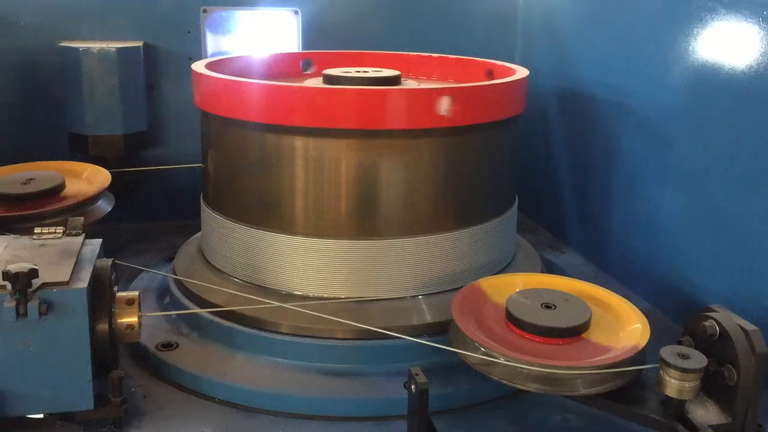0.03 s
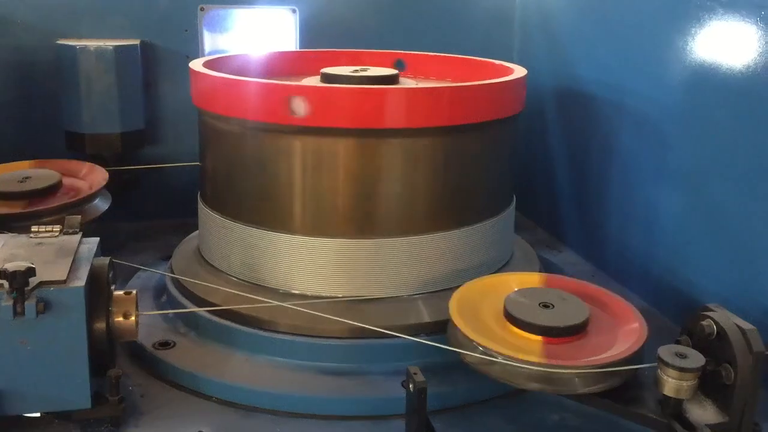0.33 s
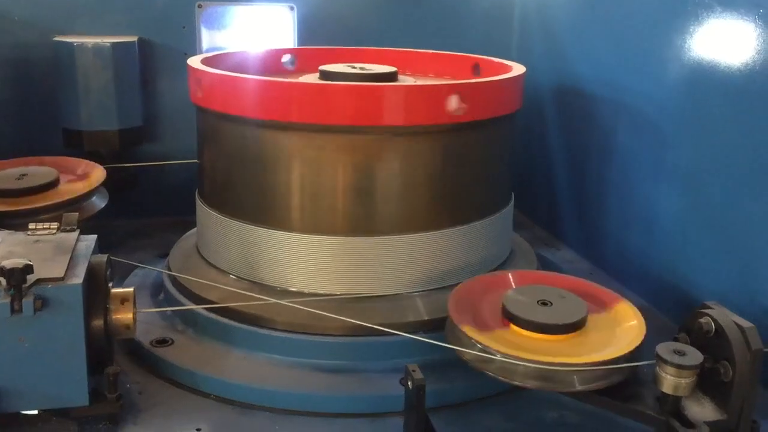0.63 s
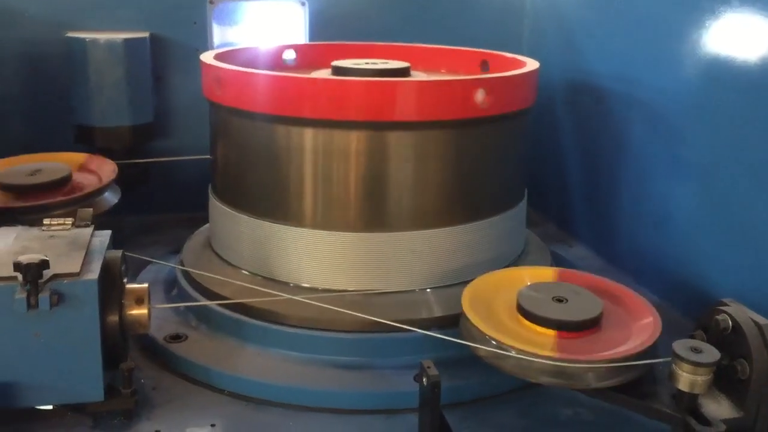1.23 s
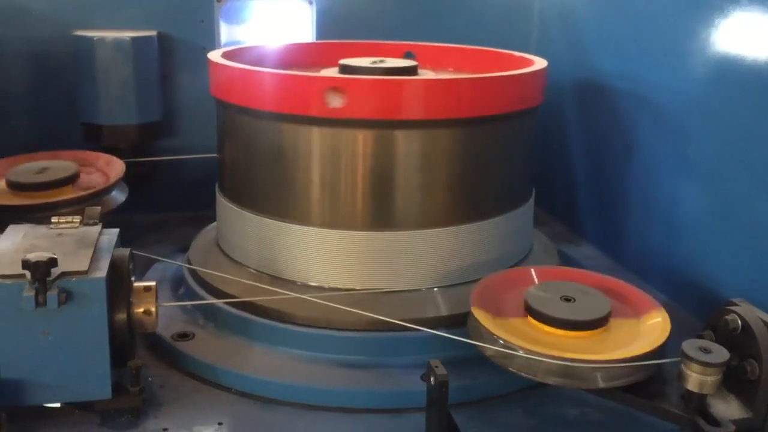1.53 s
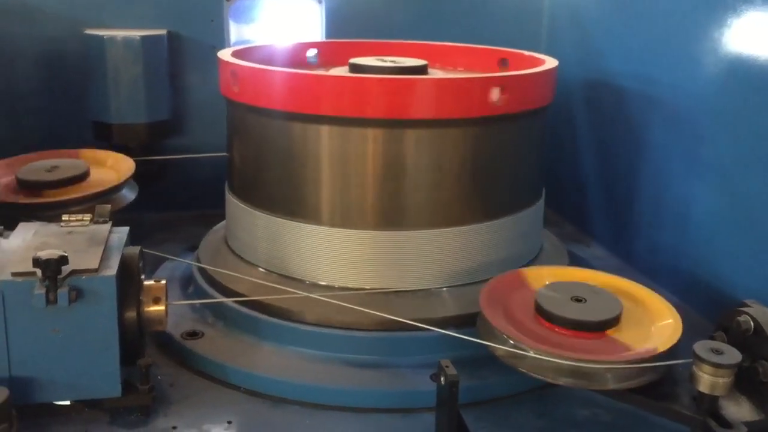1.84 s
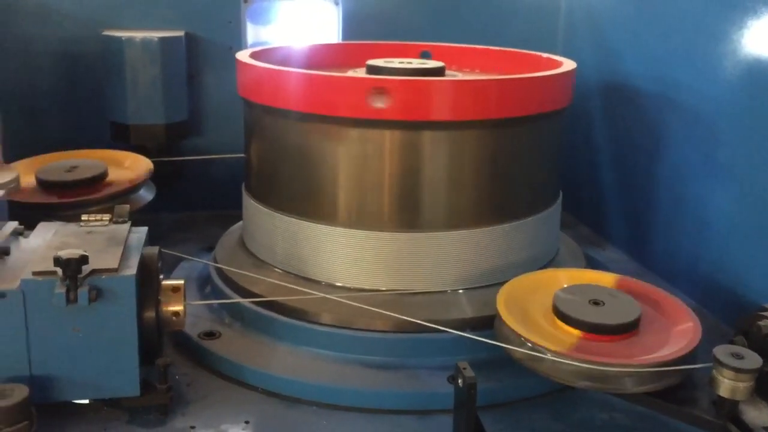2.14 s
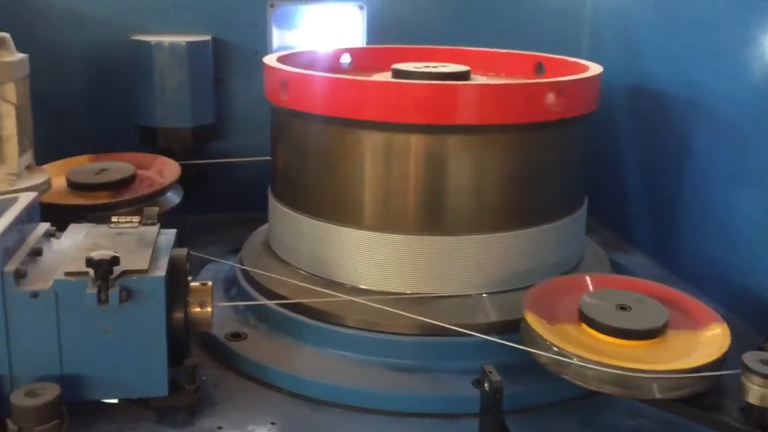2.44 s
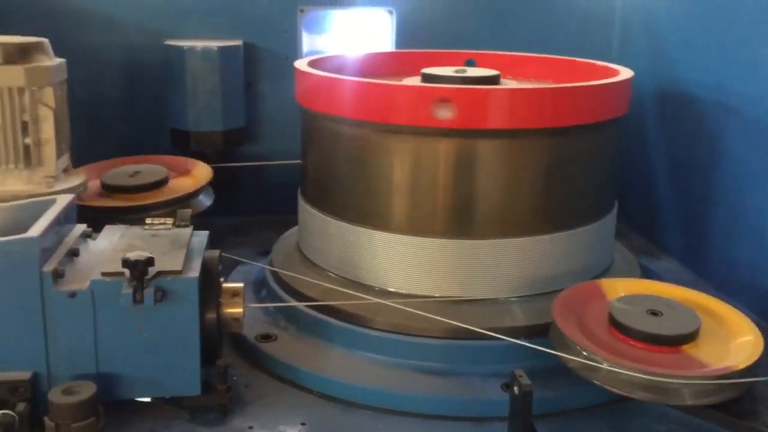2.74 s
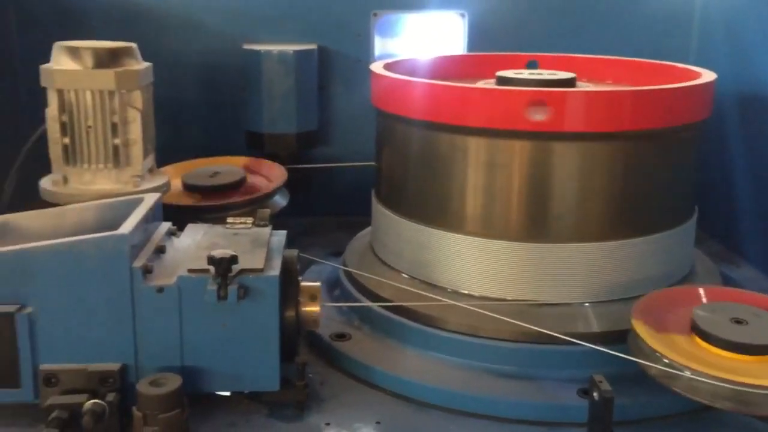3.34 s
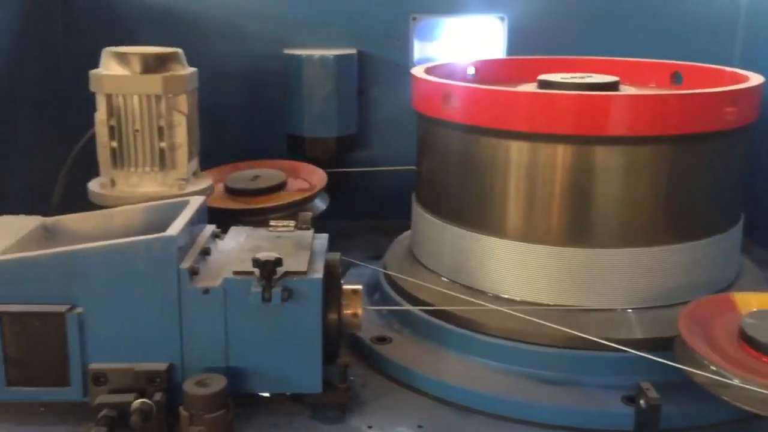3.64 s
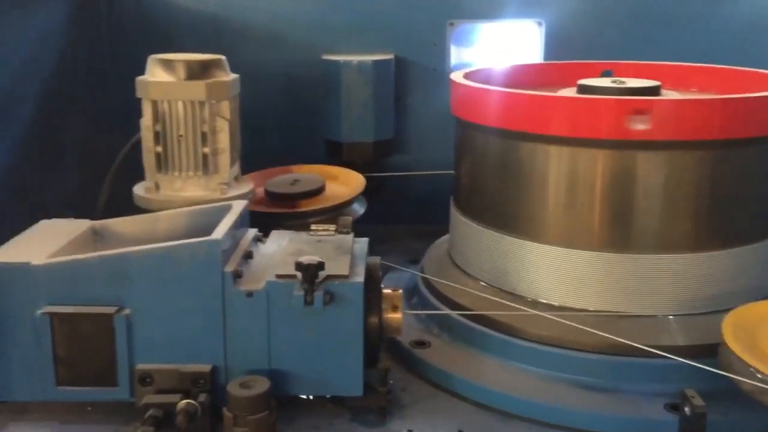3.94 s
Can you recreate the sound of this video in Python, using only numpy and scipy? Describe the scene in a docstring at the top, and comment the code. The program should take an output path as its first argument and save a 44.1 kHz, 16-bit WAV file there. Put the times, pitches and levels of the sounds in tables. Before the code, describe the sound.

Steady factory machine roar, with humming motors, thin whistling tones and hissing, squeaking wire.

```python
"""A steady machine roar with a low hum fills a factory hall: wire drawing, one microphone close by.
Gears and fans roar through the ringing housing, motors hum and a gear tone swells once a turn.
The switching of the motor drives whistles near 5 and 10 kHz. On top, the wire hisses through
the die, rubs on the pulleys, scrapes on the drum and squeaks as it sticks and slips."""
import sys
import numpy as np
from scipy import signal
from scipy.fft import rfft, irfft
from scipy.io import wavfile

SR = 44100
rng = np.random.default_rng(int(sys.argv[2]) if len(sys.argv) > 2 else 0)


def pcm_store(signal):
    """Save signal as 16-bit PCM."""
    levels = np.round(np.clip(np.atleast_2d(signal), -1, 1) * 32767)
    wavfile.write(sys.argv[1], SR, levels.astype(np.int16).T)


N = 176400


def undb(db):
    """Decibels to gain."""
    return 10 ** (np.asarray(db) / 20)


def unit(x):
    """Scale to rms 1."""
    return x / np.sqrt(np.mean(x ** 2))


def curve(t, rows):
    """Gain along a curve of t/s, level/dB."""
    return undb(np.interp(t, *np.array(rows).T))


def coloured_noise(spectrum):
    """Noise of rms 1, shaped by points of f/Hz, level/dB."""
    hz, db = np.array(spectrum).T
    f = np.maximum(np.fft.rfftfreq(N, 1 / SR), 1)
    gain = undb(np.interp(np.log(f), np.log(hz), db))
    return unit(irfft(rfft(rng.standard_normal(N)) * gain, N))


def resonance(hz, width):
    """Noise of rms 1 ringing in one resonance."""
    f = np.fft.rfftfreq(N, 1 / SR)
    return unit(irfft(rfft(rng.standard_normal(N)) / (1 + ((f - hz) / width * 2) ** 2), N))


def drift(rate_hz):
    """Smooth random drift of rms 1, rolling off above rate_hz."""
    f = np.fft.rfftfreq(N, 1 / SR)
    return unit(irfft(rfft(rng.standard_normal(N)) * (f > 0) / (1 + (f / rate_hz) ** 4), N))


def tone(hz, flutter, rate_hz):
    """A sine of rms 1 whose strength and phase flutter."""
    phase = 2 * np.pi * (np.cumsum(hz * np.ones(N)) / SR + rng.random())
    in_phase = np.sin(phase) * (1 + flutter * drift(rate_hz))
    quadrature = np.cos(phase) * flutter * drift(rate_hz)
    return unit(in_phase + quadrature)


def roar(t):
    """The bed of the sound: gear and fan noise, shaken by the running parts, rings the housing."""
    # gear and fan noise: f/Hz, relative level/dB
    spectrum = [(25, -29.6), (36, -19), (47, -4), (65, -0.5), (110, -2.5), (200, -1), (330, -3), (480, -5),
                (680, -6), (1000, -7), (1300, -10.5), (2000, -12.5), (2700, -14.5), (3500, -22),
                (5500, -31), (7000, -40.5), (9200, -32), (11000, -40.5), (13300, -45.5)]
    # housing resonances: f/Hz, width/Hz, level/dB before the sway
    modes = [(258.4, 45, -36), (307.4, 11, -35.5), (390, 30, -42.5), (605, 135, -38.5), (890, 79, -44),
             (1660, 40, -42), (2923, 120, -48.5)]
    # slow sway of the whole roar: t/s, gain/dB
    sway = [(.12, -0.3), (.6, -0.5), (1.2, 0.3), (1.8, 0), (2.6, -0.24), (3.3, 0), (4, -0.4)]
    broad = coloured_noise(spectrum) * undb(-21.5)
    housing = sum(undb(db) * resonance(hz, width) for hz, width, db in modes)
    shake = undb(.5 * drift(45))
    return (broad + housing) * curve(t, sway) * shake


def rumble(t):
    """A low rumble surges briefly, twice."""
    # bell-shaped surges: middle t/s, half-length/s, peak level/dB
    surges = [(2.91, .05, -21.5), (3.128, 0.1, -29)]
    # rumble: f/Hz, relative level/dB
    spectrum = [(25, -18), (48, 4), (90, -7), (170, -2), (330, -3), (700, -22), (2000, -48)]
    swell = sum(undb(db) * np.exp(-((t - middle) / half) ** 2) for middle, half, db in surges)
    return swell * coloured_noise(spectrum)


def drum_motor(t):
    """The motor that turns the drum gives a firm low hum."""
    # hum: t/s, level/dB
    level = [(.12, -32.5), (.6, -30), (1.2, -28), (1.85, -25.5), (2.3, -31), (3.2, -29.5), (4, -32.5)]
    return curve(t, level) * tone(98.9, flutter=.16, rate_hz=5)


def motors_and_gears(t):
    """Motors and gear stages hum and whine, all on one slightly wandering speed."""
    # hum of motors and gears: f/Hz, level/dB, flutter/0-1
    hum_tones = [(126.8, -36, .2), (167, -42, .3), (309, -41.5, .4), (429, -43, .4), (586, -40, .4),
                 (799, -45, .4), (911, -46, .4), (1581, -46, .4), (2562, -52, .3), (2789.5, -51, .4),
                 (6282, -59.5, .5)]
    # mid drone of the motors: t/s, level/dB
    drone_level = [(.5, -35), (.75, -30), (1.1, -36), (1.7, -34), (2.05, -30), (2.3, -35), (2.6, -31),
                   (3.2, -33), (3.52, -29.5), (3.8, -33)]
    # thin gear whine: t/s, level/dB
    whine_level = [(.25, -40), (.85, -46), (1.3, -37.5), (1.45, -44), (2.9, -45), (3.3, -40), (3.82, -36),
                   (4, -41)]
    # spurts of motor slot whine: t/s, level/dB
    slot_level = [(.12, -40), (.33, -42), (.82, -35.5), (1, -42), (1.42, -46), (1.66, -38), (1.9, -35.5),
                  (2.25, -46), (2.46, -37.5), (2.86, -38.5), (3, -48), (3.29, -40), (3.42, -47), (4, -41)]
    # its faint sidebands: offset/steps, level/dB
    slot_sidebands = [(-1, -50), (1, -50), (2, -49.5), (3, -48.5)]
    # gear mesh tone: t/s, gain/dB
    mesh_gain = [(.25, 0), (.85, -2), (1.15, 2.5), (1.45, -2), (2.3, .5), (3.2, 1.7), (3.5, 0)]
    slot_hz, step_hz = 2870.5, 66.5
    turn_hz, weakest_s, depth = 3.41, .405, .88
    speed = 1 + .00043 * drift(2.28)
    hum = sum(undb(db) * tone(hz * speed, flutter, rate_hz=4.9) for hz, db, flutter in hum_tones)
    drone = curve(t, drone_level) * tone(608.5 * speed, flutter=.36, rate_hz=16)
    whine = curve(t, whine_level) * tone(1267.5 * speed, flutter=.2, rate_hz=4.5)
    slots = curve(t, slot_level) * tone(slot_hz * speed, flutter=.42, rate_hz=22)
    sidebands = sum(undb(db) * tone((slot_hz + k * step_hz) * speed, flutter=.42, rate_hz=14)
                    for k, db in slot_sidebands)
    swell = 1 - depth * (1 - np.abs(np.sin(np.pi * turn_hz * (t - weakest_s))))  # once a turn
    mesh_tone = tone(1380 * speed, flutter=.097, rate_hz=6.1)
    mesh = undb(-35.5) * curve(t, mesh_gain) * unit(swell * mesh_tone)
    return hum + drone + whine + slots + sidebands + mesh


def drives(t):
    """The switching of the drives makes the windings whistle in clusters of beating tones."""
    # switching tones: f/Hz, level/dB before the upper cluster's gain
    switching = [(4877, -52.5), (4889, -58), (4908.5, -53.5), (4919, -55), (4960, -58), (4972, -57),
                 (5082, -54), (5091.5, -51), (5111, -52), (5123, -55), (9507, -64), (9588, -63),
                 (9949, -58), (10000, -52), (10036.5, -58), (10054, -60), (10104, -62), (10390, -64)]
    # upper cluster: t/s, gain/dB
    upper_gain = [(.4, 2), (1.25, -3.5), (1.8, .5), (2.35, 2), (3, 1), (3.2, -1), (4, -2)]
    # bands of crowded sidebands: f/Hz, width/Hz, level/dB
    bands = [(5200, 330, -55), (9560, 170, -54.5), (10070, 88, -57)]
    upper = curve(t, upper_gain)
    whistle = sum(undb(db) * (upper if hz > 9000 else 1) * tone(hz, flutter=.15, rate_hz=1.5)
                  for hz, db in switching)
    sizzle = sum(undb(db) * resonance(hz, width) for hz, width, db in bands)
    return whistle + sizzle


def die_hiss(t):
    """The wire slides through the die with a flickering hiss."""
    # hiss: f/Hz, relative level/dB
    spectrum = [(1500, -20), (3000, -2.5), (4100, 3), (4600, -1), (5400, 1), (7000, -6.5), (9000, -17.5),
                (11000, -13), (14000, -23.5)]
    # its course: t/s, level/dB
    level = [(.12, -37), (.3, -39), (.4, -41.5), (.68, -44), (.8, -39), (1.2, -40), (2, -38.5), (2.65, -38),
             (2.9, -40), (4, -39.5)]
    return coloured_noise(spectrum) * curve(t, level) * undb(1.34 * drift(50))


def drum_scrapes(t):
    """Turns of wire slip on the drum: each scrape starts sharply and dies away."""
    # slips: t/s, decay/s, starting level/dB
    slips = [(.77, .08, -49), (1.365, .015, -37), (1.715, .02, -48), (1.95, .07, -38.5), (3.59, .01, -41)]
    # scrape noise: f/Hz, relative level/dB
    spectrum = [(3000, -12), (6000, 0), (9000, -1), (12000, 0), (15500, -3)]
    envelope = sum(undb(db) * (t > start) * np.exp(-np.abs(t - start) / decay)
                   for start, decay, db in slips)
    return envelope * coloured_noise(spectrum)


def pulley_rub(t):
    """The wire rubs on the pulleys: six narrow bands of friction noise flare at random."""
    # gritty rubbing: t/s, level/dB
    level = [(.12, -56), (1.4, -55), (1.65, -57), (2.65, -51), (2.85, -57), (4, -57)]
    flicker_db = 6
    bands = sum(resonance(hz, width=330) * undb(flicker_db * drift(12))
                for hz in np.linspace(6600, 7960, 6))
    return unit(bands) * curve(t, level)


def wire_squeaks(t):
    """Brief stick-slip sets a pair of wire modes singing, with a scratchy chatter."""
    # squeaks: t/s, length/s, first mode f/Hz, second mode f/Hz, level/dB, roughness/0-1
    squeaks = [(.18, .05, 8620, 8400, -48, .2), (.335, .065, 8829, 8193, -44.5, .3),
               (.477, .036, 8349, 8640, -39.5, .25), (.507, .04, 8393, 8624, -44.5, .35),
               (.592, .025, 7760, 8020, -47, .2), (1.23, .105, 8274, 8726, -47, .05),
               (1.6, .05, 7000, 7330, -47.5, .9), (1.975, .035, 6290, 8100, -45, .3),
               (2.185, .04, 7450, 7100, -44.5, .7), (2.37, .08, 7600, 7350, -48, .8),
               (2.485, .045, 6500, 7300, -46, .8), (2.655, .03, 6780, 7350, -45, .9),
               (2.905, .075, 8250, 8450, -46, .8), (3.73, .06, 7220, 6900, -48, .8)]
    out = np.zeros(N)
    jitter = .0208 * drift(222)
    chatter = 1 + .3 * drift(150)
    for start, length, hz, second_hz, db, roughness in squeaks:
        progress = np.clip((t - start) / length, 0, 1)
        swell = np.sqrt(np.abs(np.sin(np.pi * progress)))
        phase_per_hz = 2 * np.pi * np.cumsum(1 + roughness * jitter) / SR
        modes = np.sin(hz * phase_per_hz) + undb(-6) * np.sin(second_hz * phase_per_hz)
        out += undb(db) * swell * chatter * unit(modes)
    return out


def scene():
    """The whole machine from close by, in mono."""
    t = np.arange(N) / SR
    machine = roar(t) + rumble(t) + drum_motor(t) + motors_and_gears(t) + drives(t)
    wire = die_hiss(t) + drum_scrapes(t) + pulley_rub(t) + wire_squeaks(t)
    return (machine + wire)[None]


def record(dry):
    """The microphone channel opens after a moment of silence and cuts the highest treble."""
    open_s, fade_s, top_hz = .12, .002, 14200
    opened = np.clip((np.arange(N) / SR - open_s) / fade_s, 0, 1)
    lowpass = signal.ellip(8, .2, 80, top_hz, fs=SR, output="sos")
    return signal.sosfilt(lowpass, dry * opened)


dry = scene()
out = record(dry)
pcm_store(out)
```